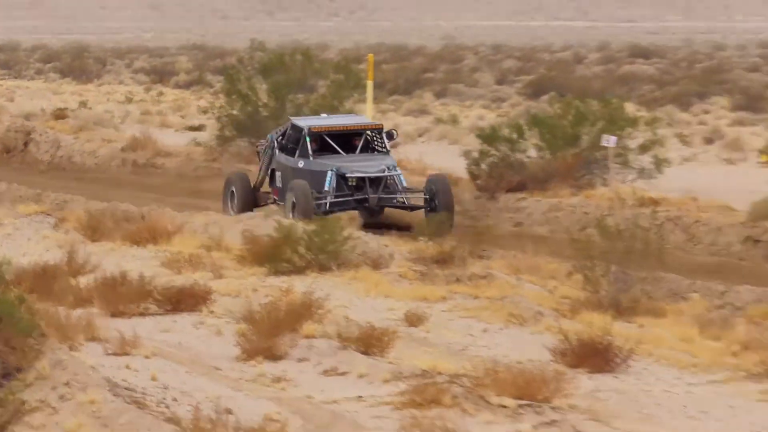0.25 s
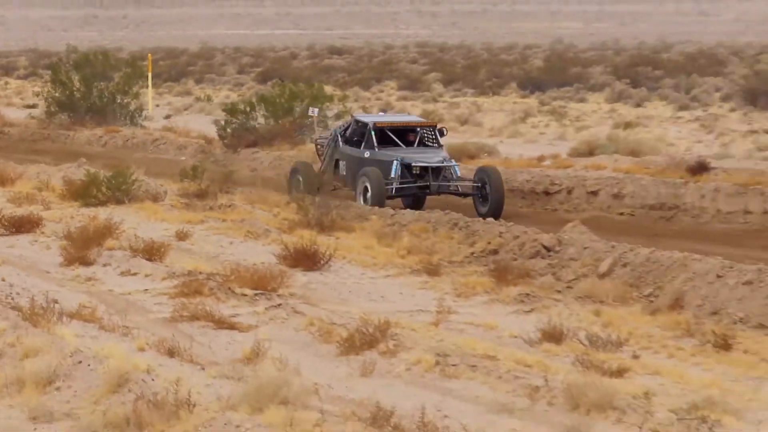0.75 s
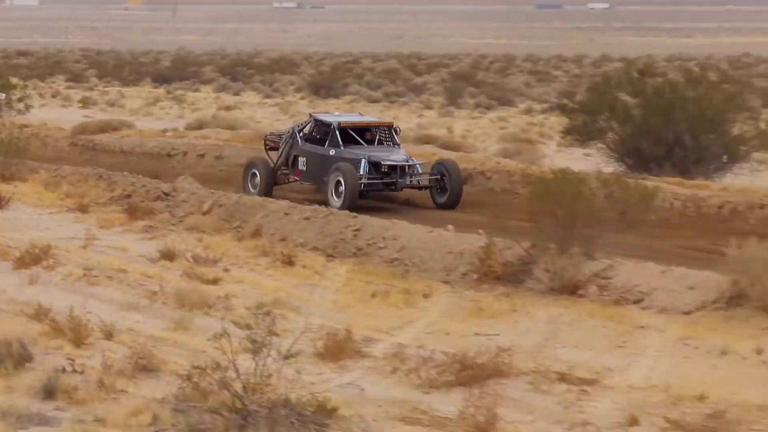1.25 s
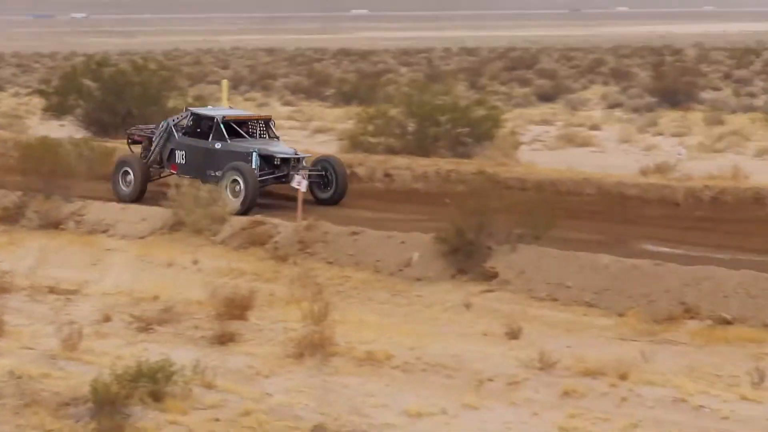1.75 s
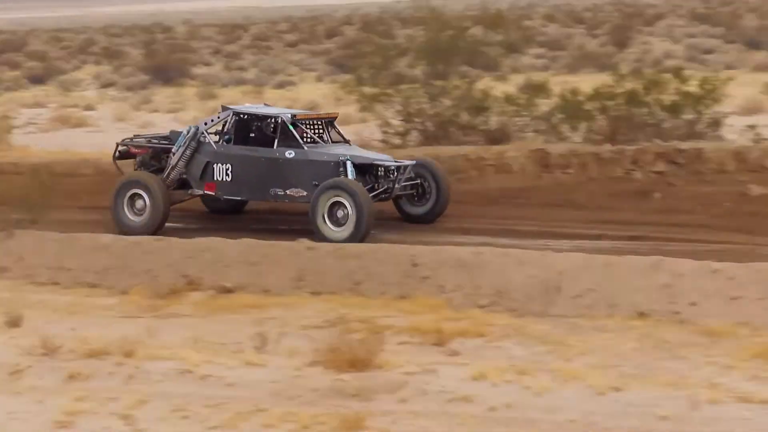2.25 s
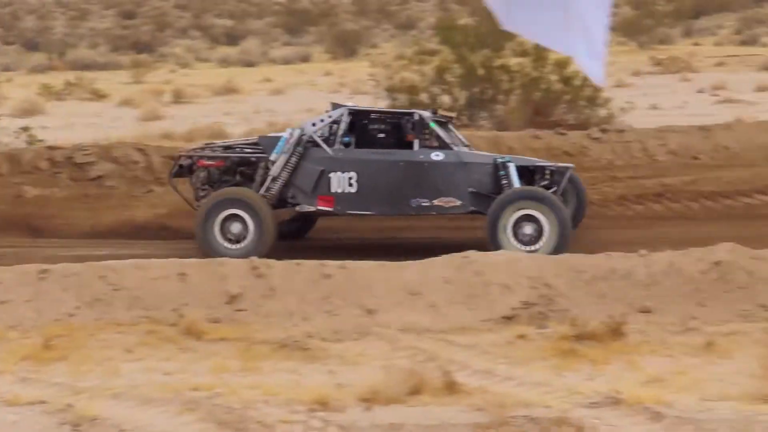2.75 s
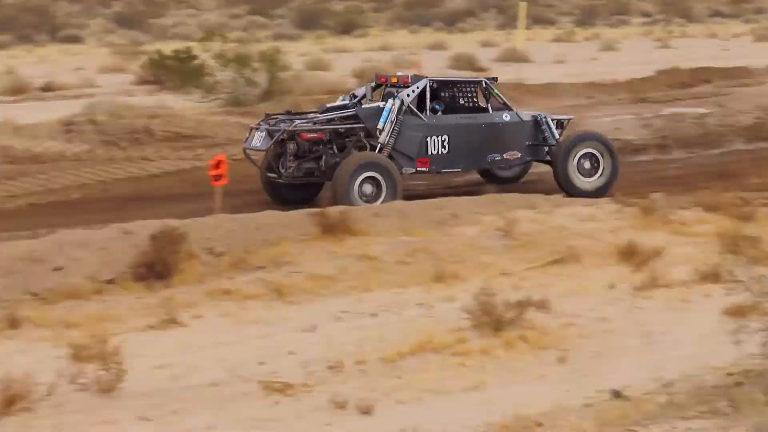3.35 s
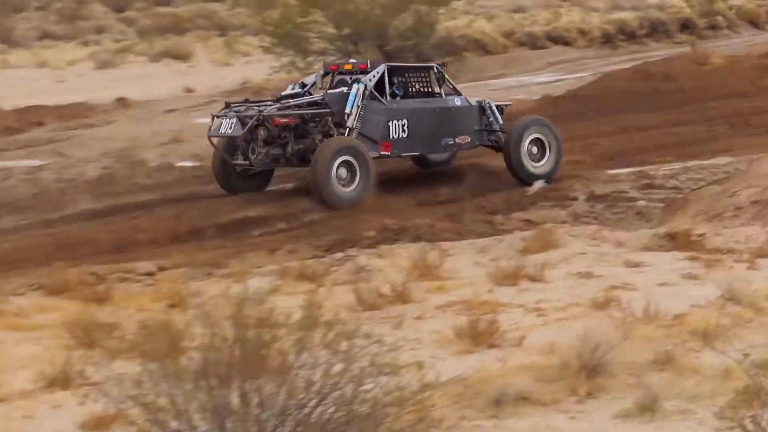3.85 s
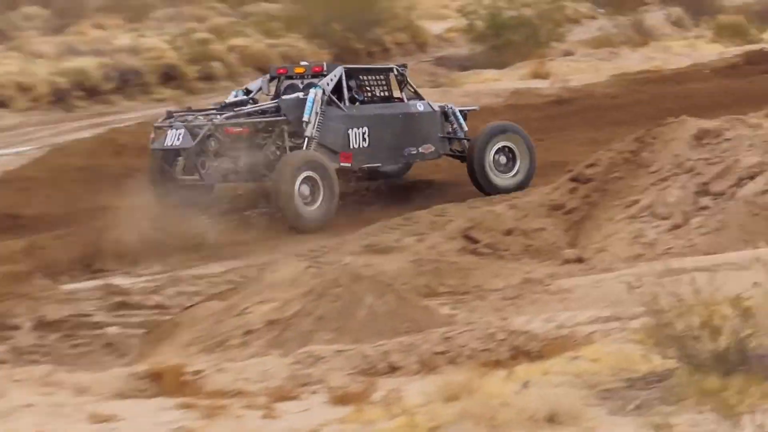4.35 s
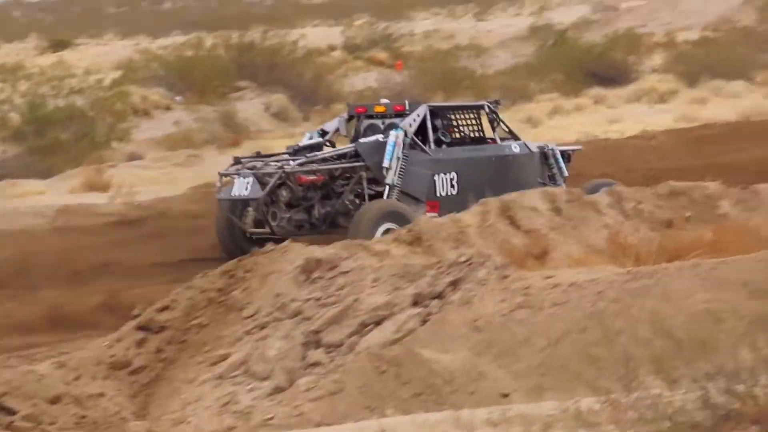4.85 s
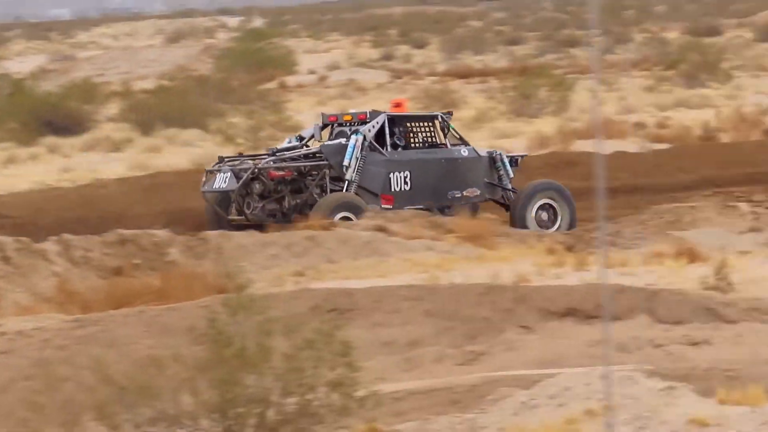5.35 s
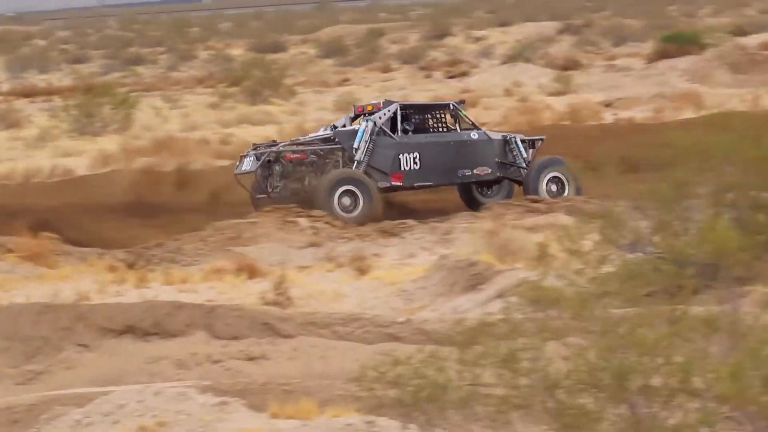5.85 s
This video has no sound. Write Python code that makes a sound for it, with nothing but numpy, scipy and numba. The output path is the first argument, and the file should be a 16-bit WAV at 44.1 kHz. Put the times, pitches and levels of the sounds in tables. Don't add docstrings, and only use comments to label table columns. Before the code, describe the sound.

Trackside in dry open desert, a close stereo microphone hears one race buggy. Its high engine note falls, flutters as the wheels bite, then holds a loud bright rasp. Off throttle it thins and sinks, crackling with low overrun pops and frame rattle, before a booming burst of power, another brief lift and a final rise in revs.

```python
import sys
import numpy as np
from scipy import signal
from scipy.fft import rfft, irfft
from scipy.io import wavfile
from scipy.ndimage import uniform_filter1d
from numba import njit

SR = 44100
rng = np.random.default_rng(int(sys.argv[2]) if len(sys.argv) > 2 else 0)


def to_linear_factor(level_db):
    exponent = np.asarray(level_db, float) / 20
    return 10 ** exponent


def pcm_store(signal):
    levels = np.round(np.clip(np.atleast_2d(signal), -1, 1) * 32767)
    wavfile.write(sys.argv[1], SR, levels.astype(np.int16).T)


N = 269010

# start_s, firings_hz
ENGINE_SPEED = [(0, 205.5), (.17, 208.8), (.36, 199), (.57, 182), (1.0, 159.8), (1.06, 175), (1.58, 182.6),
                (2.58, 164.1), (2.8, 175.5), (3.22, 153.4), (4.0, 128.9), (4.42, 133.4), (4.7, 150.2),
                (4.82, 166.6), (5.1, 167.5), (5.26, 153), (5.98, 188.5), (6.05, 170.1)]
# centre_s, speed_change_percent, half_length_s
WHEEL_SLIPS = [(.73, 2.5, .11), (1.75, .8, .1), (2.52, 5, .04), (3.39, 5, .09), (3.6, 2.5, .3),
               (4.17, 3, .15), (5.56, 6, .07), (1.075, 6.5, .045), (1.14, -4, .045), (1.21, 3, .05),
               (1.27, -5.5, .055), (4.83, 4.5, .08), (4.915, -5.5, .05), (4.98, 3.5, .05)]
# start_s, roughness_0_to_1, near_cylinder_lead_db
FIRING_QUALITY = [(0, .92, 1), (1.0, .92, 1), (1.53, .8, 3), (1.6, .2, 4), (1.85, .1, 7), (2.5, .1, 7.5),
                  (2.6, .06, 1.5), (2.93, .06, 1.5), (3.27, .14, .6), (3.38, .5, .6), (3.65, .5, .6),
                  (3.78, .18, .6), (4.05, .25, .6), (4.42, .08, .6), (4.55, .06, 1.5), (4.85, .08, 1.5),
                  (5.3, .13, .6), (6.1, .07, 1.5)]
CYLINDER_SHARES = [1.0, -.35, 0, -.3]
# start_s, level_db
BOOM_LEVEL = [(0, -21), (.25, -20.5), (.57, -14), (.74, -9.5), (1.03, -14.5), (1.1, -9.5), (2.52, -10.5),
              (2.9, -15.5), (3.25, -19.5), (3.45, -13), (4.07, -17), (4.16, -28), (4.4, -24), (4.49, -8.5),
              (5.17, -20.5), (5.4, -22.5), (5.83, -18), (6.1, -19)]
# start_s, level_db
LOAD_LEVEL = [(0, -39.5), (.3, -44.5), (.75, -33), (.97, -37.5), (1.07, -25), (1.98, -21), (2.52, -21.5),
              (2.57, -31), (2.9, -25.5), (2.97, -34.5), (3.6, -30.5), (4.2, -39.5), (4.4, -36), (4.5, -24),
              (4.85, -20), (5.15, -31.5), (5.83, -23.5), (6.1, -35.5)]
# centre_s, boom_change_db, load_change_db, half_length_s
THROTTLE_LIFTS = [(.28, -4.5, 1.5, 0.11), (.85, -5, 7, 0.033), (1.14, -7.5, -4, 0.016),
                  (1.265, -1.5, -5.5, 0.039), (1.49, -5, 2, .04), (2.6, -16.5, -4.5, 0.082),
                  (2.955, -16, -3, 0.055), (4.34, -12.5, 0.5, .05), (5.27, -4, -13.5, 0.11),
                  (5.51, -2, -4, 0.046), (5.65, 2, -4.5, 0.14), (4.93, 1, -3, 0.046),
                  (5.99, -4.5, 2, 0.091)]
# centre_s, second_order_rise_db, half_length_s
WHEEL_BITES = [
    (.92, 10, .16),
    (1.14, 12, .06),
    (1.27, 14, .07),
]
# start_s, bark_over_load_db, second_under_boom_db, third_under_bark_db
PIPE_BALANCE = [(0, 5, -19.5, -10.5), (.6, -2, -32.5, -14), (.85, -8, -31.5, -9.5), (1.3, -13, -34, -25),
                (1.5, -8.5, -39.5, -23.5), (1.6, -7.5, -38.5, -4), (2.3, -6, -42, -12.5),
                (2.55, -5, -27, -12.5), (2.75, 10.5, -38, -21), (2.95, 2, -31, -4.5),
                (3.08, -0.5, -14.5, -14.5), (3.95, -1.5, -19.5, -20.5), (4.2, -2.5, -28.5, -6),
                (4.42, 9, -24, -7.5), (4.56, 3, -11, -13.5), (4.78, 1.5, -13, -17.5), (5.27, 3.5, -14, -5),
                (6.1, 3.5, -10.5, -29.5)]
# start_s, centre_hz, width_hz
PIPE_RING = [(0, 810, 738), (1.1, 827, 726), (1.6, 900, 539), (2.5, 910, 530), (2.6, 860, 388),
             (2.75, 956, 362), (2.93, 903, 378), (3.28, 864, 385), (3.42, 770, 626), (3.97, 763, 490),
             (4.16, 530, 173), (4.46, 539, 176), (4.55, 930, 882), (4.85, 1050, 877), (5.1, 853, 834),
             (6.1, 770, 756)]
# centre_hz, width_hz, level_db
RASP_MODES = [
    (1090, 180, -10),
    (1574, 230, -5),
]
# start_s, pitch_ratio
DOPPLER_PITCH = [
    (0, 1.0),
    (2.4, 1.0),
    (4.4, .92),
    (6.1, .92),
]
# start_s, treble_gain_db
LINE_OF_SIGHT = [(0, -1), (.6, -4), (1.2, 2), (1.6, -2), (2.3, 8.5), (2.8, 3), (3.2, 8), (3.9, 4),
                 (4.4, 4.5), (4.75, -7.5), (5.15, -1), (5.27, -19.5), (5.45, -2), (6.1, 2.5)]
# start_s, rise_db, fade_s
FRAME_RATTLES = [(.12, 11, .025), (0.799, 3, 0.027), (1.07, 7.5, 0.031), (1.36, 3.5, .03), (1.83, 7, .04),
                 (2.27, 3, .06), (2.87, 0.5, 0.035), (3.37, 8.5, 0.024), (3.535, 15.5, 0.072),
                 (3.665, 4.5, 0.024), (4.47, 8, 0.035), (4.66, 2.5, 0.013), (4.95, 4, 0.033),
                 (5.52, 9, 0.057), (5.69, 3, .02), (5.795, 11, 0.14)]
# frequency_hz, density_db_per_hz
FIZZ_COLOUR = [(1800, -43.5), (2700, 1), (3500, 6), (4300, -1), (5000, -6.5), (6500, -15), (9000, -38)]
# frequency_hz, density_db_per_hz
SIZZLE_COLOUR = [(4200, -11), (6000, -1.5), (8500, -2.5), (11000, -8), (14000, -8), (16000, -9)]
# centre_s, rise_db, half_length_s
UNEVEN_BURNS = [(.12, 18, 0.21), (.66, 19, 0.086), (.9, 14.5, 0.27), (1.13, 17, 0.12), (1.3, 16, .12),
                (1.5, 13.5, 0.064), (2.5, 13.5, 0.11), (3.3, 16, 0.46), (3.7, 8.5, 0.4), (4.05, 17.5, 0.12),
                (4.65, 11, 0.44)]
# start_s, level_db
GROUND_LEVEL = [(0, -44.5), (.5, -43), (1.3, -35.5), (2.68, -33.5), (3.0, -45), (3.55, -67.5), (4.0, -52.5),
                (4.38, -37), (5.15, -57)]
# centre_s, rise_db, half_length_s
RUT_HITS = [(.2, 11, 0.22), (.52, 5, 0.29), (.83, 15, 0.073), (.92, 0.5, 0.24), (2.79, -6, 0.23),
            (2.9, 11.5, 0.023), (3.35, -1.5, 0.08), (4.09, 3.5, 0.039), (5.21, -5, 0.051), (5.62, 6.5, .15)]
# frequency_hz, density_db_per_hz
RUMBLE_COLOUR = [(15, -31), (28, -12.5), (55, -0.5), (100, -4), (200, -1.5), (400, -16), (900, -43.5),
                 (2500, -90.5)]
# start_s, peak_db
STONE_TICKS = [(1.0667, -37), (1.209, -37.5), (1.2692, -45), (1.704, -37), (1.9377, -33), (2.0746, -31),
               (2.1365, -27), (2.174, -27), (2.1914, -35), (2.2039, -33), (2.4505, -28), (2.4646, -24.5),
               (2.4978, -19), (2.5254, -36), (2.723, -51.5), (3.384, -28), (3.5402, -22.5), (3.6278, -29),
               (3.6425, -28.5), (3.6703, -29.5), (4.4687, -47), (4.5376, -54.5), (4.663, -35.5),
               (4.8725, -42.5), (4.9025, -39), (4.951, -38), (5.5356, -30), (5.6905, -51), (5.794, -22)]
# start_s, peak_db, ring_hz, crack_db
OVERRUN_POPS = [(1.495, -18.5, 201.3, -23.5), (3.334, -16, 211, -19.5), (3.359, -8.5, 223.6, -17),
                (3.386, -17, 192.6, -17), (3.601, -32, 194, -20.5), (3.618, -5.5, 206, -13.5),
                (3.634, -24, 190, -34.5), (3.646, -12.5, 203, -26.5), (3.658, -16.5, 212.6, -35.5),
                (3.676, -23, 214.5, -18), (4.068, -16, 197, -33)]
# frequency_hz, side_minus_mid_db
PORT_DIFFERENCE = [(60, -20), (150, -36), (280, -16), (600, -32), (1200, -29), (2500, -18), (5000, -13),
                   (10000, -7)]


def in_time(rows):
    s, *columns = np.transpose(rows)
    return [np.interp(np.arange(N) / SR, s, c) for c in columns]


def swells(rows):
    s, *columns, half = np.transpose(rows)
    knots = np.arange(0, N, 32)
    away = (knots / SR - s[:, None]) / half[:, None]
    shape = np.cos(np.pi / 2 * np.clip(away, -1, 1)) ** 2
    return [np.interp(np.arange(N), knots, c @ shape) for c in columns]


def evened(x, span_s=.046):
    return x / np.sqrt(uniform_filter1d(x ** 2, int(span_s * SR)) + 1e-12)


def coloured(x, points):
    hz = np.maximum(np.fft.rfftfreq(N, 1 / SR), 1)
    table = np.array(points)
    gain_db = np.interp(np.log(hz), np.log(table[:, 0]), table[:, 1])
    return irfft(rfft(x) * to_linear_factor(gain_db), N)


def passed(x, hz, kind, order=2):
    return signal.sosfilt(signal.butter(order, hz, kind, fs=SR, output="sos"), x)


@njit
def resonance(x, turn, r):
    out = np.zeros(len(x))
    for i in range(2, len(x)):
        ringing = 2 * r[i] * np.cos(turn[i]) * out[i - 1] - r[i] ** 2 * out[i - 2]
        out[i] = (1 - r[i]) * x[i] + ringing
    return out


def pipe(x, hz, width_hz):
    steady = np.ones(N)
    return resonance(x, 2 * np.pi * hz / SR * steady, np.exp(-np.pi * width_hz / SR) * steady)


def exhaust_boom(turns, boom_db, bark_db, second_under, third_under):
    crest = .56
    second_db = boom_db + second_under + swells(WHEEL_BITES)[0]
    first = np.cos(2 * np.pi * (turns - crest)) * to_linear_factor(boom_db + 3.5)
    second = np.cos(4 * np.pi * (turns - crest)) * to_linear_factor(second_db + 3.5)
    third = -np.cos(6 * np.pi * (turns - .17)) * to_linear_factor(bark_db + third_under + 3)
    return first + second + third


def pipe_bark(blast, bark_db):
    bark_hz, width_hz = in_time(PIPE_RING)
    first = pipe(blast, bark_hz, width_hz)
    bark = pipe(first, bark_hz, width_hz) - 1.1 * passed(first, 830, "high")
    bark = evened(passed(bark, 520, "high", order=3))
    upper_hz = 1.63 * bark_hz
    upper_mode = evened(pipe(pipe(blast, upper_hz, 190), upper_hz, 170))
    coasting = np.clip(3 * (1 - width_hz / 294), 0, 1)
    bark = bark + to_linear_factor(-7.5) * coasting * upper_mode
    return to_linear_factor(bark_db - 0.37) * evened(bark)


def tail_rasp(snap, strength, puffs, fired, lead, lead_db, rasp_db):
    knock = .075
    doppler = in_time(DOPPLER_PITCH)[0]
    rasp = sum(to_linear_factor(db) * pipe(snap, hz * doppler, width) * hz / 1500 for hz, width, db in RASP_MODES)
    spike = knock * np.maximum(lead, 0) * fired
    tail = strength * (to_linear_factor(.5 * lead) * puffs - spike)
    rasp = rasp + to_linear_factor(-4) * pipe(tail, 2150 * doppler, 650)
    rasp = passed(passed(rasp, 670, "high"), 1880, "low", order=4)
    return to_linear_factor(rasp_db - 4.0) * evened(rasp)


def rattle_jolts():
    s, db, fade = np.transpose(FRAME_RATTLES)[:, :, None]
    knots = np.arange(0, N, 32)
    since = np.maximum(knots / SR - s, 0)
    shape = (1 - np.exp(-since / 0.0022)) * np.exp(-(since / fade) ** 2)
    return np.interp(np.arange(N), knots, (db * shape).sum(axis=0))


def engine_fizz(strength, lead, within, rasp_db, bright_db):
    fizz_db = -49 + 0.65 * (rasp_db + 28) + 0.65 * bright_db
    bursts = (np.exp(-within / 0.14) + .5) * rng.standard_normal(N)
    fizz = coloured(strength * to_linear_factor(0.56 * lead) * bursts, FIZZ_COLOUR)
    return to_linear_factor(fizz_db - 1.6) * evened(fizz, 0.059)


def engine_sizzle(chance, within, rasp_db, bright_db):
    sizzle_db = -64 + 0.59 * (rasp_db + 28) + bright_db
    bursts = (np.exp(-within / 0.085) + 0.64) * rng.standard_normal(N)
    sizzle = coloured(to_linear_factor(2.3 * chance) * bursts, SIZZLE_COLOUR)
    top = passed(sizzle, 8400, "high", order=4)
    top = top * to_linear_factor(np.clip(sizzle_db + 50.5, -30, 4))
    sizzle = passed(sizzle, 8600, "low", order=4) + top
    return to_linear_factor(sizzle_db + 1.0) * evened(sizzle, 0.042)


def burn_stumble(chance, fired):
    stumble = passed(pipe(chance * fired, 220, 90), [110, 300], "band")
    return to_linear_factor(-42 + swells(UNEVEN_BURNS)[0]) * stumble / np.std(stumble)


def engine():
    firing_hz = in_time(ENGINE_SPEED)[0] * (1 + swells(WHEEL_SLIPS)[0] / 100)
    turns = np.cumsum(firing_hz) / SR
    count, within = turns.astype(int), turns % 1
    fired = np.diff(count, prepend=0) > 0

    boom_lift, load_lift = swells(THROTTLE_LIFTS)
    boom_db = in_time(BOOM_LEVEL)[0] + boom_lift
    rasp_db = in_time(LOAD_LEVEL)[0] + load_lift
    bark_over, second_under, third_under = in_time(PIPE_BALANCE)
    bark_db = rasp_db + bark_over
    bright_db = in_time(LINE_OF_SIGHT)[0] + rattle_jolts()

    rough, lead_db = in_time(FIRING_QUALITY)
    chance = rng.standard_normal((2000, 3))[count]
    lead = lead_db * np.array(CYLINDER_SHARES)[count % 4]
    strength = to_linear_factor(.1 * lead + (.3 + 1.5 * rough) * chance[:, 0])
    swell_and_fade = within / .2 * np.exp(1 - within / .2)
    puffs = (swell_and_fade + .25) * rng.standard_normal(N) * .07
    blast = strength * (np.sqrt(rough) * puffs + np.sqrt(1 - rough) * fired)
    upper = rough ** .95
    snap = strength * (np.sqrt(upper) * puffs - np.sqrt(1 - upper) * to_linear_factor(.85 * lead) * fired)

    return (exhaust_boom(turns, boom_db, bark_db, second_under, third_under)
            + pipe_bark(blast, bark_db)
            + tail_rasp(snap, strength, puffs, fired, lead, lead_db, rasp_db)
            + engine_fizz(strength, lead, within, rasp_db, bright_db)
            + engine_sizzle(chance[:, 2], within, rasp_db, bright_db)
            + burn_stumble(chance[:, 1], fired))


def tyre_rumble():
    tyres_db, wind_db = in_time(GROUND_LEVEL)[0] + swells(RUT_HITS)[0] + 2.5, -55.5
    mid, side = coloured(rng.standard_normal((2, N)), RUMBLE_COLOUR)
    level = np.hypot(to_linear_factor(tyres_db), to_linear_factor(wind_db)) / np.std(mid)
    return level * (mid + to_linear_factor(-12) * side * np.array([[1], [-1]]))


def stone_ticks():
    out, t = np.zeros(N + 800), np.arange(800) / SR
    for s, db in STONE_TICKS:
        click = passed(rng.standard_normal(800), [5000, 12000], "band", order=1)
        out[round(s * SR):][:800] += to_linear_factor(db - 13.5) * click * np.exp(-t / 0.0013)
    return out[:N]


def overrun_pops():
    out, t = np.zeros(N + 4000), np.arange(4000) / SR
    for s, db, hz, crack_db in OVERRUN_POPS:
        ring = to_linear_factor(db) * np.sin(2 * np.pi * hz * t) * np.exp(-t / 0.012)
        crack = passed(rng.standard_normal(4000), [400, 1800], "band")
        out[round(s * SR):][:4000] += ring + to_linear_factor(crack_db) * crack * np.exp(-t / 0.02)
    return out[:N]


def scene():
    car = engine() + stone_ticks() + overrun_pops()
    t = np.arange(2000) / SR
    scatter = rng.standard_normal(2000) * np.exp(-t / .01)
    echoes = signal.fftconvolve(car, scatter / np.linalg.norm(scatter))[:N]
    side = coloured(echoes, PORT_DIFFERENCE)
    return car + side * np.array([[1], [-1]]) + tyre_rumble()


def roll_off(x):
    return signal.sosfilt(signal.butter(12, 15750, fs=SR, output="sos"), x)


def record(dry):
    cut = passed(passed(dry, 30, "high"), 15000, "low", order=8)
    mix = 1.6 * np.tanh(cut / 1.6)
    return roll_off(mix)


dry = scene()
out = record(dry)
pcm_store(out)
```